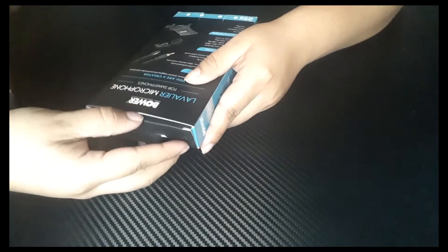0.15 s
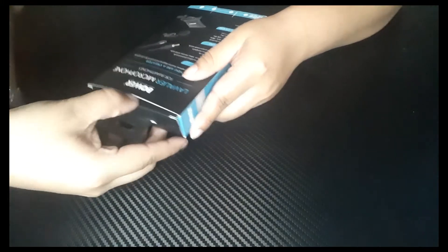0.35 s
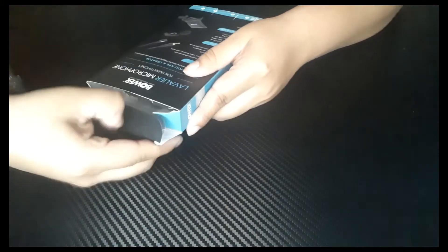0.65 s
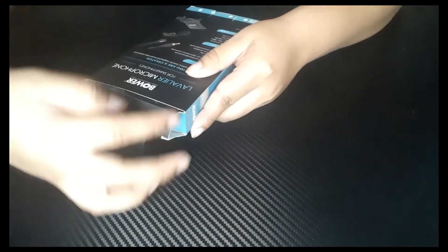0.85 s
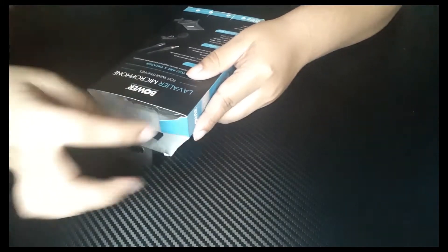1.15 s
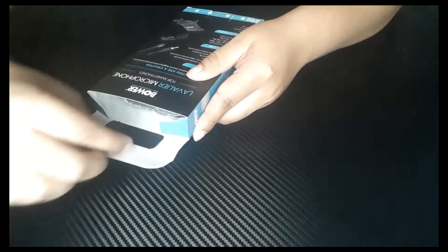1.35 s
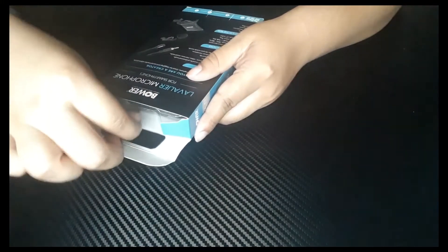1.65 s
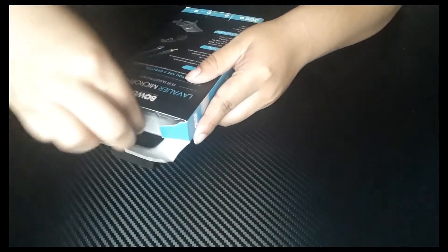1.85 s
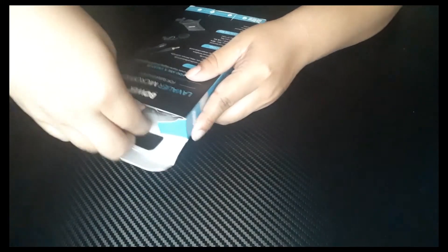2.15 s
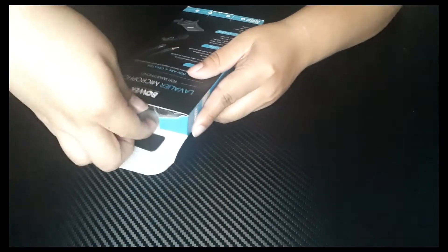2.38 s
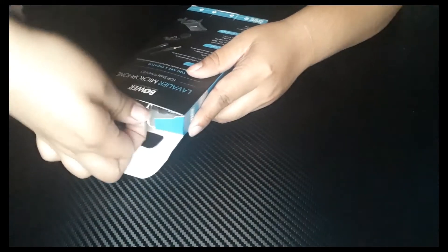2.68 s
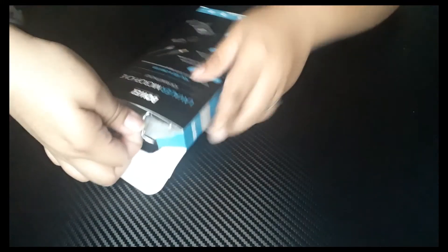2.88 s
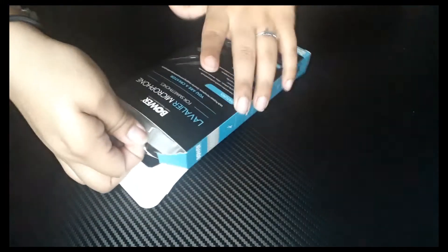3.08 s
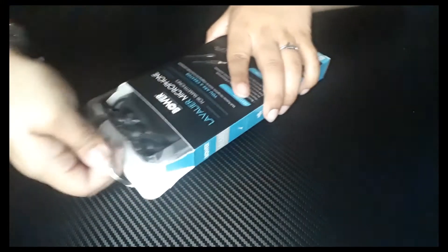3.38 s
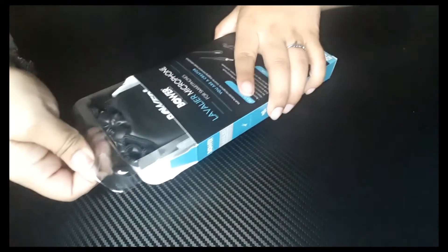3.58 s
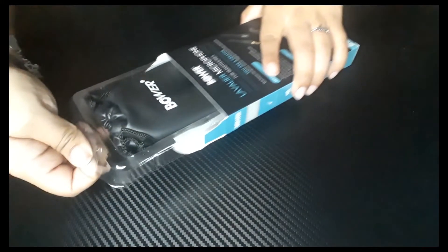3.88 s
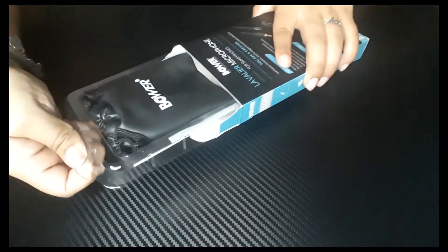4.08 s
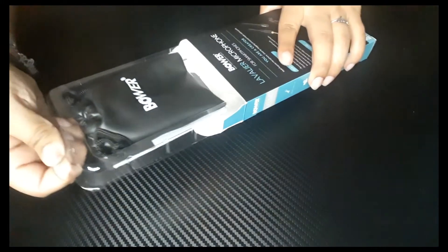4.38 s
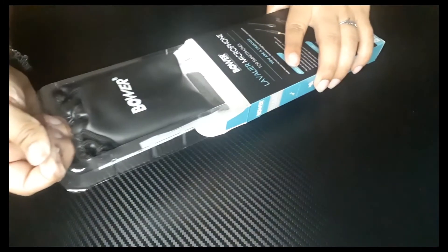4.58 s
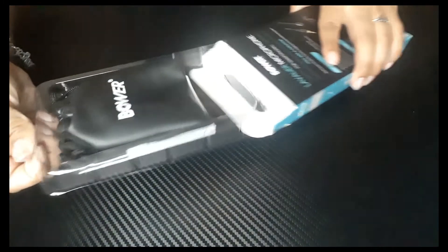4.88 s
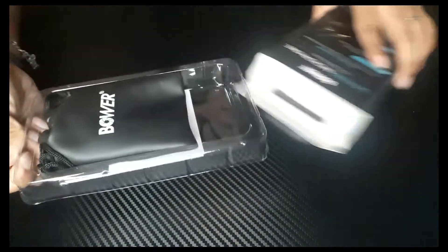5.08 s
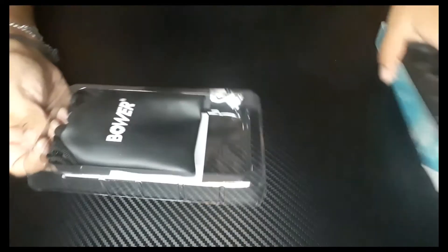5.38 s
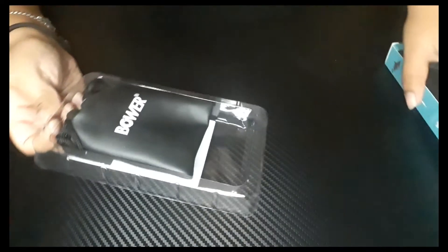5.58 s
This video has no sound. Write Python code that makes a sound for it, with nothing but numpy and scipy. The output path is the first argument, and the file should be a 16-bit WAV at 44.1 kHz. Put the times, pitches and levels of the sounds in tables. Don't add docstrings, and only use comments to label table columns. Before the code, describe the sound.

Irregular sharp snaps, crinkles and dry rustling as hands open a small cardboard box and drag out a brittle plastic tray.

```python
import sys
import numpy as np
from scipy import signal
from scipy.fft import rfft, irfft
from scipy.io import wavfile
from scipy.ndimage import uniform_filter1d, map_coordinates

SR = 44100
rng = np.random.default_rng(int(sys.argv[2]) if len(sys.argv) > 2 else 0)


def wav_out(sig):
    wavfile.write(sys.argv[1], SR, np.round(np.clip(np.atleast_2d(sig).T, -1, 1) * 32767).astype(np.int16))


def makeup_ratio(level_db):
    decades = np.asarray(level_db, float) / 20
    return 10 ** decades


N = 253310


def rms_one(x):
    return x / np.sqrt(np.mean(x ** 2) + 1e-20)


def peak_one(x):
    return x / np.abs(np.mean(x, axis=0)).max(axis=-1, keepdims=True)


def in_time(rows):
    s, *columns = np.transpose(rows)
    return [np.interp(np.arange(N) / SR, s, c) for c in columns]


def at_hz(points, hz, order=1):
    points = np.array(points)
    return np.interp(np.log(hz), np.log(points[:, 0]), points[:, order])


def band(x, low_hz, high_hz):
    edges_hz = [low_hz, min(high_hz, .45 * SR)]
    return signal.sosfilt(signal.butter(2, edges_hz, "band", fs=SR, output="sos"), x)


def resonance(x, hz, width_hz):
    r = np.exp(-np.pi * width_hz / SR)
    poles = [1, -2 * r * np.cos(2 * np.pi * hz / SR), r * r]
    return signal.lfilter([(1 - r * r) / 2, 0, (r * r - 1) / 2], poles, x)


def drift(rate):
    hop, settling = 40, 2000
    r = np.exp(-2 * np.pi * hop * rate / SR)
    white = rng.standard_normal(N // hop + settling + 2)
    slow = signal.lfilter([1], [1, -2 * r, r * r], white)[settling:]
    return np.interp(np.arange(N) / hop, np.arange(len(slow)), rms_one(slow))


def two_ports(mid, side, hz):
    # (f/Hz, left-right likeness/1)
    likeness = [(60, .9), (300, .92), (600, .8), (1200, .72), (2400, .52), (5000, .25), (15000, .03)]
    alike = np.clip(at_hz(likeness, hz), 0, 1)
    return np.array([np.sqrt(1 + alike) * mid + sign * np.sqrt(1 - alike) * side for sign in (1, -1)])


def friction(spectrum, per_s, spread_db, clump_db, patchy_db):
    chance = rng.random((2, 2, N)) * SR / per_s
    sizes = np.maximum(chance, .007) ** (-spread_db / 8.686) * (chance < 1)
    slips = sizes * rng.standard_normal((2, 2, N)) * makeup_ratio(clump_db * drift(34)) + 1e-9
    lowest_hz, highest_hz = spectrum[0][0], spectrum[-1][0]
    edges = lowest_hz * 2 ** np.arange(0, np.log2(highest_hz / lowest_hz) + .3, 1 / 3)
    out = 0
    for k, (low, high) in enumerate(zip(edges, edges[1:])):
        hz = np.sqrt(low * high)
        level_db = at_hz(spectrum, hz)
        if level_db > -32:
            gain = makeup_ratio(level_db + patchy_db * drift(7.6))
            out = out + gain * two_ports(*band(slips[k % 2], low, high), hz)
    return out / np.sqrt(np.mean(np.mean(out, axis=0) ** 2))


def background():
    # (f/Hz, level/dB per Hz)
    rumble_spectrum = [(15, -65), (25, -36), (37, -22.5), (51, -7), (70, 4), (141, -3), (183, -5),
                       (280, -17.5), (360, -33), (620, -120)]
    # (t/s, level/dB)
    rumble_course = [(0, -69.5), (.6, -67), (.9, -73.5), (1.6, -73), (2.0, -70.5), (2.9, -68), (3.2, -75.5),
                     (3.84, -80), (4.1, -71), (4.84, -69), (5.74, -69.5)]
    # (t/s, level/dB)
    hum_course = [(0, -74), (1.9, -78), (2.15, -73), (2.55, -63), (2.7, -85), (5.74, -93.5)]
    rumble = friction(rumble_spectrum, per_s=20000, spread_db=0.2, clump_db=2.5, patchy_db=0.9)
    hum_hz = 113 * (1 + 0.0067 * drift(2.8))
    hum = makeup_ratio(in_time(hum_course)[0] + 1.9 * drift(6)) * np.sin(2 * np.pi * np.cumsum(hum_hz) / SR)
    return makeup_ratio(in_time(rumble_course)[0]) * rumble + hum


def room(x):
    # (f/Hz, t60/s, level/dB)
    decay = [(202.4, 0.22, 0), (600, 0.34, 5), (1440, 0.29, 6), (4100, 0.34, 4), (8000, 0.38, 6.5),
             (14400, 0.29, 5.5)]
    t = np.arange(SR // 2) / SR
    white, tail = rng.standard_normal((2, len(t))), 0
    edges = 140 * 2 ** np.arange(0, 7.1, .5)
    for low, high in zip(edges, edges[1:]):
        hz = np.sqrt(low * high)
        fading = makeup_ratio(at_hz(decay, hz, order=2) - 60 * t / at_hz(decay, hz))
        tail = tail + fading * two_ports(*band(white, low, high), hz)
    onset = np.clip((t - .005) / 0.00096, 0, 1)
    tail = rms_one(tail * onset) / np.sqrt(len(t))
    return signal.fftconvolve(x[None], makeup_ratio(10) * tail, axes=1)[:, :N]


def pushes():
    # (t/s, peak level/dB, f/Hz)
    hand_pushes = [(.019, -58, 327), (0.581, -22, 361), (.582, -39, 196), (.748, -48, 396),
                   (1.955, -47.5, 213), (2.716, -48.5, 242), (2.929, -47, 209), (3.039, -55, 175),
                   (3.276, -43, 610), (3.412, -51, 330), (4.098, -55, 195), (4.29, -32, 770),
                   (4.611, -49.5, 147), (4.612, -25.5, 830), (5.311, -44, 317)]
    out, t = np.zeros(N + SR), np.arange(SR // 8) / SR
    for s, peak_db, hz in hand_pushes:
        i = round(s * SR)
        swing = (1 - np.exp(-t * hz / 0.27)) * np.sin(2 * np.pi * hz * t)
        out[i:i + len(t)] += makeup_ratio(peak_db - 60 * t * hz / 24) * swing
    return out[:N]


def effort():
    # (peak t/s, swell/s, fade/s, scrape level/dB, box body against scrape/dB);
    # swell and fade span 20 dB
    flap_rub = [
        (.02, 0.16, 0.14, -65, 6.5),
        (.25, 0.034, 0.22, -52.5, -10),
        (.39, 0.27, 0.18, -57, 6),
        (.57, 0.094, 0.061, -40, -5),
        (.595, .02, 0.085, -30, -16),
        (.73, 0.13, .14, -44.5, -10),
    ]
    tab_rub = [
        (1.12, 0.13, .2, -63.5, -9),
        (1.3, 0.16, 0.12, -67.5, 0.5),
        (1.46, 0.055, 0.55, -59, -12),
        (1.58, 0.12, 0.067, -64, -7),
        (1.83, .1, .1, -77, -6),
        (1.9, 0.035, 0.17, -50.5, -18.5),
        (2.04, 0.18, 0.071, -51, -5.5),
        (2.23, 0.24, 0.24, -56.5, -1.1),
        (2.42, .3, 0.14, -58.5, 0.5),
    ]
    tug_rub = [
        (2.67, 0.017, 0.089, -61.5, 6),
        (2.755, 0.087, 0.13, -35, -10),
        (2.92, 0.051, 0.089, -55.5, 11.5),
        (3.08, .15, 0.18, -65.5, 6.5),
        (3.34, 0.047, .15, -50, -6.5),
        (3.42, 0.13, 0.11, -49, -1.2),
    ]
    slide_rub = [
        (3.75, 0.33, 0.42, -62, 3),
        (4.0, 0.56, 0.38, -56, 0.5),
        (4.29, 0.13, 0.16, -58, 0),
        (4.55, 0.14, 0.25, -64.5, -1.5),
    ]
    free_rub = [
        (4.65, 0.061, 0.19, -52.5, 2),
        (4.8, 0.28, 0.75, -49.5, -2.5),
        (4.96, 0.042, 0.088, -36, 2),
        (5.11, 0.14, 0.26, -35, -6.5),
        (5.24, 0.38, 0.042, -39, -22),
        (5.319, 0.014, 0.28, -37, -11),
        (5.42, 0.039, .2, -34.5, -9.5),
        (5.6, 0.4, 0.46, -48.5, -3.5),
    ]
    hiss_share = [
        -1.5,
        -3,
        0.7,
        -1.5,
        -8,
    ]
    resting = [
        -88.5,
        -83.5,
        -74,
    ]
    t = np.arange(0, N + 64, 64) / SR
    power = makeup_ratio(resting)[:, None] ** 2 + 0 * t
    for strokes, hiss_db in zip((flap_rub, tab_rub, tug_rub, slide_rub, free_rub), hiss_share):
        for s, swell_s, fade_s, db, body_db in strokes:
            away = np.abs(t - s) / np.maximum(np.where(t < s, swell_s, fade_s), .004)
            layers_db = np.array([db + body_db, db, db + hiss_db])
            power = power + makeup_ratio(layers_db[:, None] - 20 * away ** 1.23) ** 2
    return [np.interp(np.arange(N) / SR, t, 10 * np.log10(p)) for p in power]


def cavity(x, width_hz):
    # (t/s, f/Hz, strength/dB)
    air = [(0, 440, 15), (.3, 970, 9), (.55, 923, -8), (2.2, 760, -9.5), (2.85, 990, 0), (2.89, 1200, 8),
           (2.96, 1240, 10.5), (2.99, 870, -8), (3.9, 840, -3), (4.2, 703, -17), (4.65, 756, 6),
           (5.1, 1110, 15.5), (5.25, 1050, 11), (5.41, 610, 4), (5.55, 765, 1), (5.74, 734, -18)]
    hz, strength_db = in_time(air)
    out, state, size = np.zeros_like(x), np.zeros((2, 2)), 256
    r = np.exp(-np.pi * width_hz / SR)
    for i in range(0, N, size):
        poles = [1, -2 * r * np.cos(2 * np.pi * hz[i] / SR), r * r]
        out[:, i:i + size], state = signal.lfilter([1 - r, 0, r - 1], poles, x[:, i:i + size], zi=state)
    gain = makeup_ratio(strength_db)
    return (x + gain * out) / np.sqrt(1 + 0.34 * gain ** 2)


def rubbing():
    # (f/Hz, level/dB per Hz)
    body_spectrum = [(120, -34), (200, -11.5), (228, -19), (311, -6), (919, 1.5), (1180, -4), (1320, -6),
                     (2070, -11), (2200, -24.5), (2860, -38), (4840, -120)]
    # (f/Hz, level/dB per Hz)
    scrape_spectrum = [(710, -32), (1200, -2), (1830, -5.5), (3060, -5), (6010, -10.5), (8000, -25.5),
                       (10400, -42.5), (17600, -120)]
    # (f/Hz, level/dB per Hz)
    hiss_spectrum = [(3820, -33.5), (6500, 1.5), (7910, -2.5), (11600, -0.5), (13700, 0.5), (15200, -12),
                     (16000, -27.5)]
    # (f/Hz, width/Hz, level/dB); the level is not used
    tray_ribs = [(2298, 94, -1), (3102, 140, 0), (3770, 190, 0), (4253, 130, -3), (4740, 65, -1),
                 (5360, 18, -5), (6040, 57, -4)]
    body_db, scrape_db, hiss_db = effort()
    body = friction(body_spectrum, per_s=3000, spread_db=3, clump_db=1.5, patchy_db=1.2)
    body = cavity(body, width_hz=100)
    scrape = friction(scrape_spectrum, per_s=3400, spread_db=0.0, clump_db=1.23, patchy_db=2.5)
    ribs = sum(resonance(scrape, hz, 1.24 * max(width_hz, 60)) for hz, width_hz, _ in tray_ribs)
    hiss = friction(hiss_spectrum, per_s=15000, spread_db=1.0, clump_db=0.0, patchy_db=4.0)
    return makeup_ratio(body_db) * body + makeup_ratio(scrape_db - 4) * (scrape + makeup_ratio(4) * ribs) + makeup_ratio(hiss_db) * hiss


def buckle_rows():
    # (t/s, peak level/dB, panel pitch f/Hz, bright edge level/dB)
    flap_snaps = [(.058, -49, 4300, -1), (.1138, -47.5, 6340, -11), (.191, -39, 1090, -8.5),
                  (.239, -35, 1280, -3.5), (.2577, -39.5, 980, -7.5), (.3009, -33.5, 1180, -14.5),
                  (.3192, -34.5, 1180, -14), (.3624, -36.5, 898, -15.5), (.3939, -32, 958, -14),
                  (.4026, -27, 940, -7.5), (.4495, -25, 900, -16.5), (.5675, -24.5, 3570, -1.5),
                  (.5732, -13, 4970, -15), (.5819, -11, 3880, -32), (.5848, -3.5, 3900, -17),
                  (.5868, -12.5, 6460, -17), (.7014, -29.5, 3970, -28), (.7485, -8.5, 3400, -7.5),
                  (.7497, -18.5, 4640, -27)]
    tab_snaps = [(1.0369, -51.5, 1300, -23), (1.1158, -32.5, 3990, -28), (1.1246, -39, 3300, -18),
                 (1.1566, -38, 1020, -29), (1.2212, -34.5, 3960, -25), (1.2775, -36, 2960, -29),
                 (1.296, -31, 1150, -39), (1.4225, -40, 6100, -13), (1.4281, -44.5, 3350, -13),
                 (1.493, -45, 4560, -10), (1.5104, -39, 1070, -12), (1.5398, -38, 1173, -14),
                 (1.5593, -34, 3490, -14), (1.5636, -38, 3710, -18), (1.569, -38.5, 3010, -22),
                 (1.5927, -41.5, 1070, -30), (1.5982, -41, 1590, -27), (1.7734, -51.5, 3280, -20),
                 (1.875, -39.5, 3330, -10), (1.9558, -18.5, 3120, -17.5), (2.005, -42, 2290, -1),
                 (2.045, -37.5, 1730, -8), (2.052, -36, 4100, -16), (2.1074, -45, 926, -16),
                 (2.152, -29.5, 4000, -35)]
    tug_snaps = [(2.5378, -35.5, 948, -17), (2.601, -37.5, 2780, -22), (2.6097, -34.5, 1038, -34),
                 (2.623, -29, 1110, -21), (2.6561, -10.5, 2380, -13), (2.7167, -7.5, 5150, -7),
                 (2.7248, -13, 6500, 1.5), (2.7311, -13, 6500, -16), (2.8978, -40, 1280, -3),
                 (2.9413, -39, 1280, -25), (2.9792, -49, 1010, -37), (3.0838, -43, 936, -10),
                 (3.2269, -39.5, 1280, -26), (3.277, -30.5, 2340, -18), (3.4147, -16.5, 3400, -13),
                 (3.5754, -46, 1280, -22.5), (3.6102, -33, 1400, -13)]
    free_snaps = [(4.2882, -41, 896, -29), (4.6133, -14.5, 1670, -47), (4.614, -15.5, 3150, -52),
                  (4.6173, -22, 1150, -45), (4.8892, -31.5, 1060, -33), (4.9369, -22, 1740, -24),
                  (4.9476, -7, 1660, -36), (4.9488, -13.5, 2950, -40), (4.9624, -24, 876, -17),
                  (4.9778, -17.5, 1160, -19), (5.0401, -15.5, 1240, -17), (5.0467, -21.5, 1090, -13),
                  (5.311, -34, 3550, -20), (5.413, -37, 800, -18)]
    # (hollow thud level/dB, room share level/dB)
    actions = [
        (-15, -11),
        (-24.5, -14.5),
        (-19, -11.5),
        (-18.5, -14.5),
    ]
    tables = (flap_snaps, tab_snaps, tug_snaps, free_snaps)
    rows = np.array([row + action for table, action in zip(tables, actions) for row in table])
    s, peak_db, hz, edge_db, thud_db, room_db = rows.T[..., None]
    force_db = peak_db + 32.5
    thud_db = thud_db - 2 * np.log2(hz / 1500) - 0.2117 * force_db
    return s, peak_db, hz, thud_db, edge_db, room_db - 0.128 * force_db


def evened(x, size):
    lines = rfft(x)
    return irfft(lines / (uniform_filter1d(np.abs(lines), size) + 1e-9), x.shape[-1])


def buckles(hz, thud_db, edge_db, chance):
    t = np.arange(chance.shape[-1]) / SR
    crease = evened(chance * (1 - np.exp(-t / 0.00011)) * makeup_ratio(-60 * t / 0.016), size=24)
    crease = crease * makeup_ratio(-60 * t / 0.045)
    modes = [resonance(crease[:, k], hz[k, 0], 0.13 * hz[k, 0]) for k in range(len(hz))]
    broad = makeup_ratio(-9.5 + 0.11 * (edge_db + 16)) * band(crease, 700, 4620)
    panel = two_ports(*band(np.stack(modes, axis=1) + broad, 650, 7500), hz)
    thud = two_ports(*band(chance * t / .0015 * makeup_ratio(-60 * t / 0.028), 360, 1324), 300)
    edge = two_ports(*band(band(crease, 6500, 16500), 6500, 16500), 9000)
    return peak_one(panel) + makeup_ratio(thud_db + 4.5) * peak_one(thud) + makeup_ratio(edge_db + 6.5) * peak_one(edge)


def snaps():
    s, peak_db, hz, thud_db, edge_db, room_db = buckle_rows()
    size = 1200
    chance = rng.standard_normal((len(s), 2, size)).swapaxes(0, 1)
    click = np.zeros_like(chance)
    click[0, :, 30] = 1
    near = makeup_ratio(peak_db) * buckles(hz, thud_db, edge_db, chance)
    far = makeup_ratio(peak_db + room_db + 3) * buckles(hz, thud_db + 5.0, edge_db, click)[0]
    direct, sent = np.zeros((2, N + size)), np.zeros(N + size)
    starts = np.round((s[:, 0] - .0002) * SR).astype(int)
    for k, i in enumerate(starts):
        direct[:, i:i + size] += near[:, k]
        sent[i:i + size] += far[k]
    return direct[:, :N], sent[:N]


def scene():
    # (t/s, left minus right level/dB, left lag/samples)
    side_of_box = [(0, -2.5, 0), (4.4, -1, 1.5), (4.8, -2.5, -3.5), (5.2, 1, -8), (5.74, 0.2, -16.5)]
    direct, sent = snaps()
    lean_db, lag = in_time(side_of_box)
    box = direct + rubbing() + pushes() + room(sent)
    left, right = box * makeup_ratio([lean_db / 2, -lean_db / 2])
    left = map_coordinates(left, [np.arange(N) - lag], order=3)
    return np.array([left, right]) + background() * makeup_ratio([[-.7], [.7]])


def band_limit(x):
    return signal.sosfilt(signal.butter(12, 16670, fs=SR, output="sos"), x)


def record(dry):
    # f/Hz, width/Hz, level/dB
    port_dip = (8250, 1400, -10)
    hz, width_hz, dip_db = port_dip
    port = dry - (1 - makeup_ratio(dip_db)) * resonance(dry, hz, width_hz)
    port = signal.sosfilt(signal.butter(4, 15400, fs=SR, output="sos"), port)
    rounded = 1.6 * np.tanh(port / 1.6)
    finished = signal.sosfilt(signal.cheby2(10, 60, 16600, fs=SR, output="sos"), rounded)
    return band_limit(finished)


dry = scene()
out = record(dry)
wav_out(out)
```